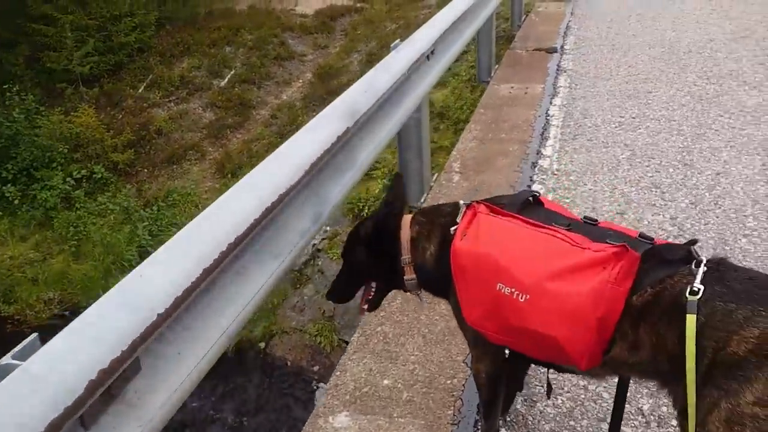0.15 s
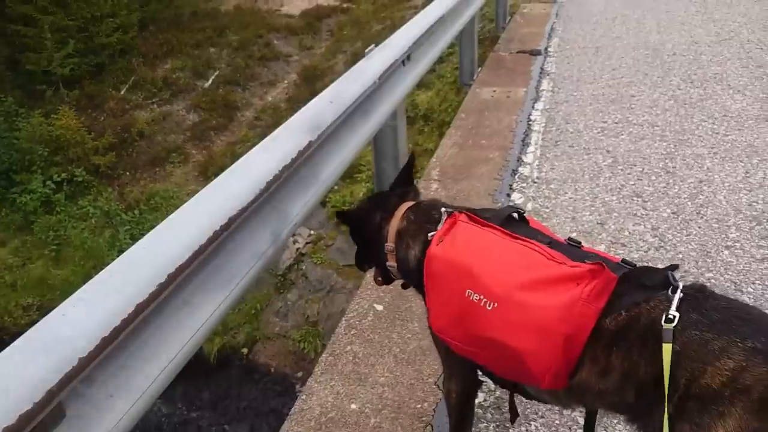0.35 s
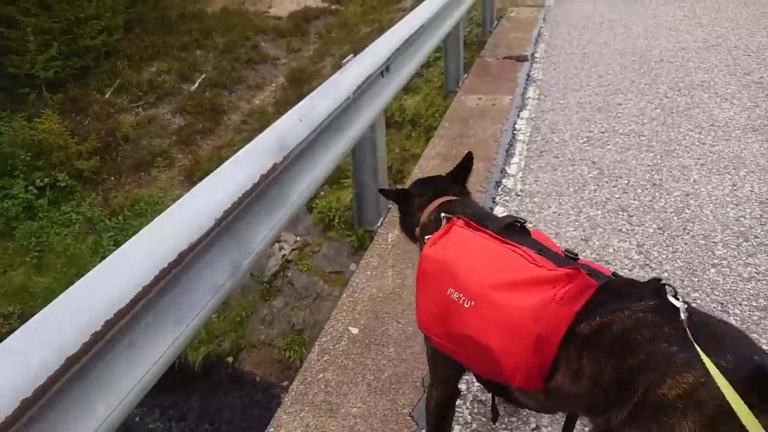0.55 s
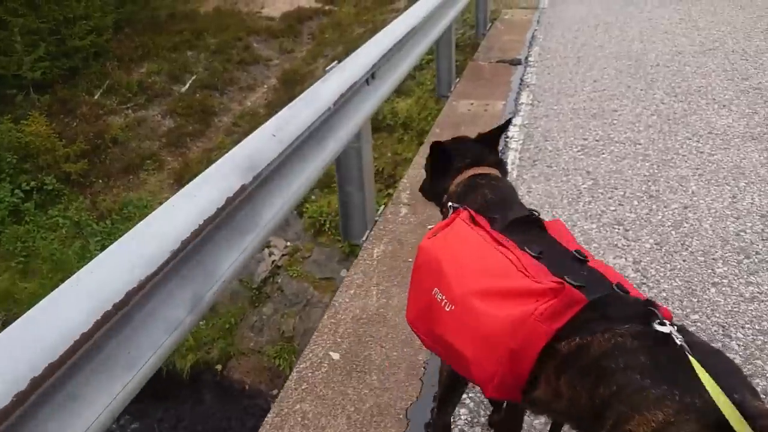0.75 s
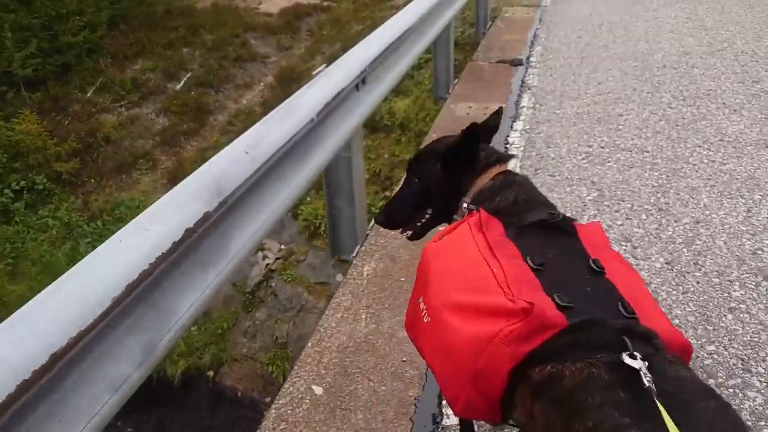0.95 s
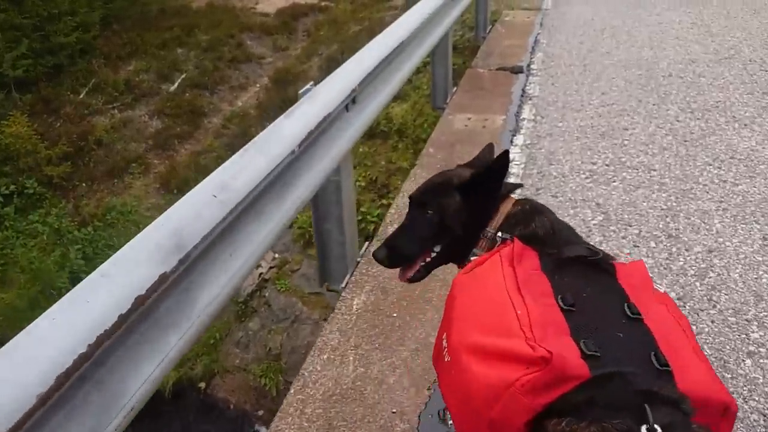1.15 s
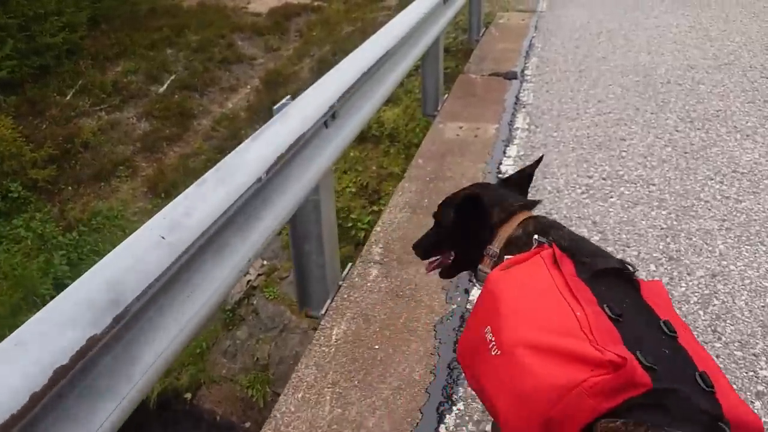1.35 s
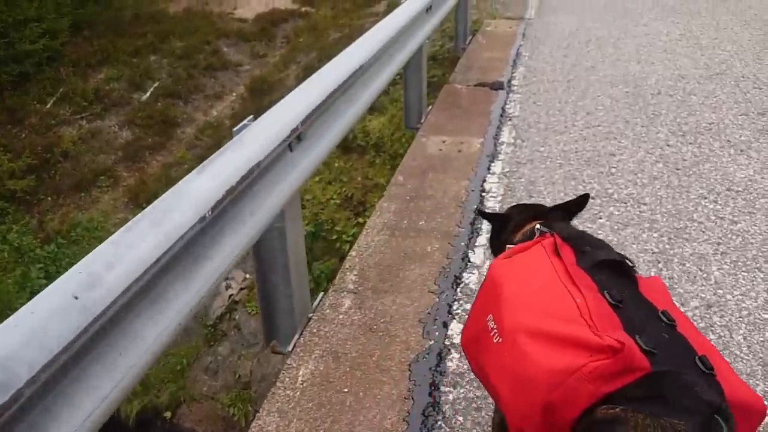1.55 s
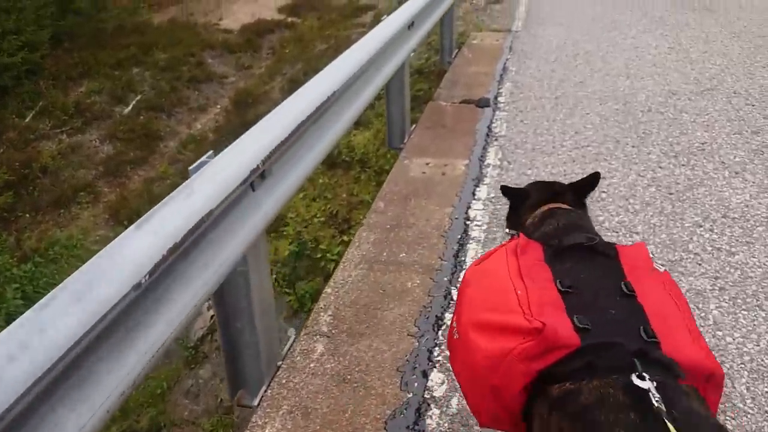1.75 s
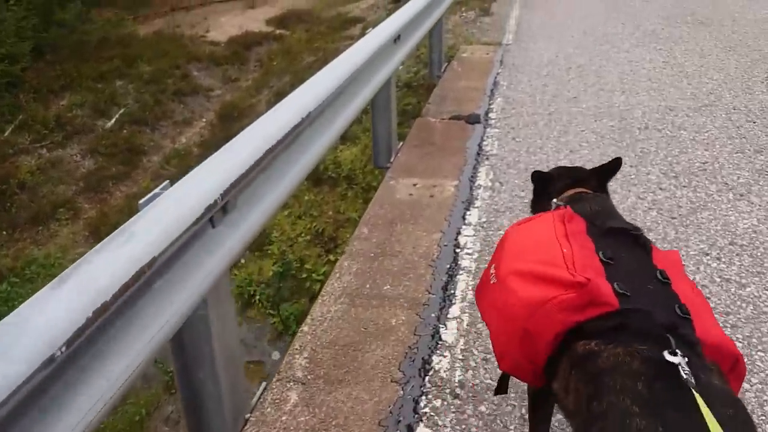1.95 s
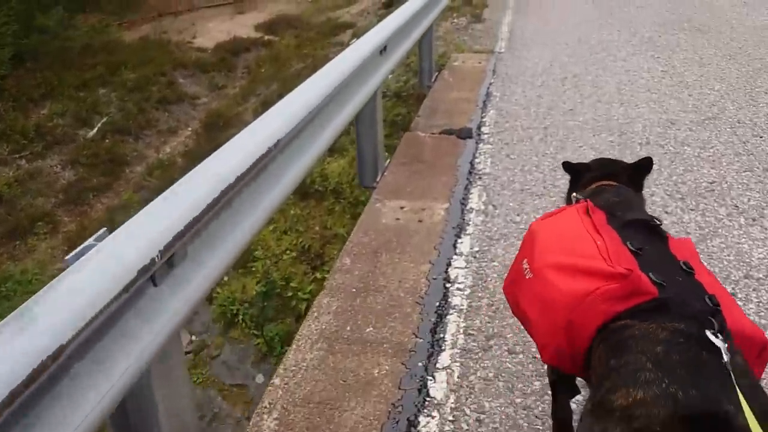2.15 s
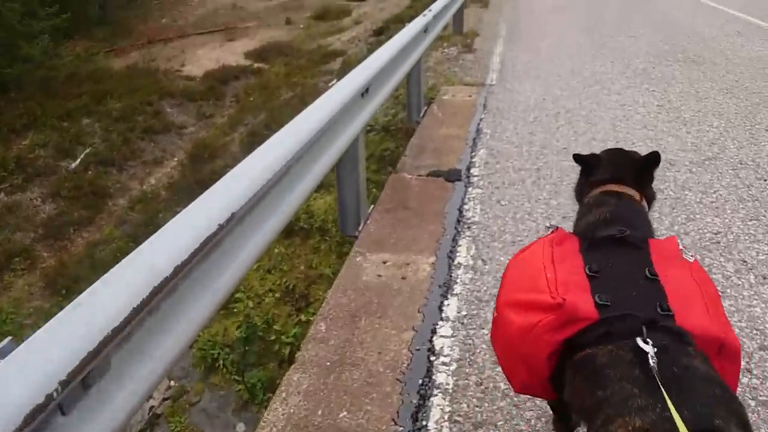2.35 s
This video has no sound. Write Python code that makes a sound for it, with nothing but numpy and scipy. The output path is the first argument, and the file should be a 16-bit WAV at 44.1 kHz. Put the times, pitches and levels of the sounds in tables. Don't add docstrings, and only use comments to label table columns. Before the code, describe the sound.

A small stream rushes steadily over stones below left. Close on the right, a retractable dog lead ratchets in two rapid bursts, then its brake snaps once; soft paw steps, outdoors, hand-held stereo microphone.

```python
import sys
import numpy as np
from scipy import signal
from scipy.fft import rfft, irfft
from scipy.io import wavfile
from scipy.ndimage import uniform_filter1d

SR = 44100
rng = np.random.default_rng(int(sys.argv[2]) if len(sys.argv) > 2 else 0)


def gain_from_db(level_db):
    decades = np.asarray(level_db, float) / 20
    return 10 ** decades


def master(y):
    cut = np.clip(np.atleast_2d(y).T, -1, 1)
    pcm = np.round(cut * 32767)
    wavfile.write(sys.argv[1], SR, pcm.astype(np.int16))


N = 105840

# time in seconds, level in dB.
FLOW = [(0, -52.5), (.3, -49), (.55, -50), (.65, -51), (.75, -51), (.85, -51.5), (1.3, -51), (1.45, -49.5),
        (1.62, -50.5), (1.74, -47.5), (1.88, -51), (2.05, -49.5), (2.4, -51.5)]
# frequency in Hz, density in dB per Hz.
WATER_TONE = [(30, -3), (70, -2), (185, -9.5), (310, 4.5), (700, -0.5), (1500, -4.5), (3500, -11.5),
              (8000, -21.5)]
# frequency in Hz, likeness from 0 to 1.
WATER_LIKENESS = [(100, 0), (250, 1), (500, 0.6), (900, 0.72), (1700, 0.38), (4000, 0.34), (6000, 0.016),
                  (9000, 0)]
# time in seconds, level in dB.
SPLASH = [(0, 4.5), (.5, -4), (.8, -3), (1.1, -1), (1.4, 0), (1.6, 1), (1.9, 0.5), (2.4, 1.5)]
# start in seconds, level in dB, pitch in Hz.
GLUGS = [(0.556, -34, 536), (0.718, -33.5, 369), (.74, -33.5, 600), (.86, -37.5, 307), (1.11, -36, 322),
         (1.184, -38, 247), (1.222, -34.5, 318), (1.627, -37, 243), (1.73, -33.5, 347), (1.995, -38, 398),
         (2.016, -39, 277), (2.067, -43, 260), (2.099, -43.5, 225), (2.179, -40, 378), (2.21, -41.5, 272),
         (1.44, -41.5, 348), (1.483, -44, 375), (.641, -41, 405), (.686, -47, 372), (0.051, -46.5, 224),
         (1.76, -44, 443)]
# start in seconds, level in dB, pitch in Hz, left-right balance in dB.
PAWS = [
    (0.173, -32, 132, -3),
    (0.236, -37.5, 137, -11),
    (0.46, -45, 97, -17),
    (1.037, -43, 153, -11),
    (1.442, -51, 147, -20),
    (1.507, -41, 136, -10),
    (2.042, -31, 171, -3),
    (2.056, -39.5, 114, -8),
    (2.105, -52, 70, -17),
    (2.252, -43, 50.7, -26),
]
# start in seconds, pawl snap in dB, casing in dB, spring ping in dB.
TEETH = [(0.1794, -25, -35.5, -50), (0.208, -21.5, -27, -44), (0.2187, -26, -35, -48),
         (0.235, -23.5, -26, -36), (0.2426, -21.5, -39, -44), (0.2549, -17.5, -24.5, -34.5),
         (0.2627, -26, -32.5, -45), (0.2732, -18.5, -23.5, -37), (0.2807, -22, -30, -37),
         (0.2897, -19, -28, -31), (0.3035, -20, -23.5, -31), (0.3163, -18, -24, -32),
         (0.3218, -24, -39, -42), (0.329, -24, -28, -41), (0.3324, -24.5, -30.5, -41),
         (0.3413, -27, -30, -48), (0.3513, -19.5, -27, -36), (0.361, -22.5, -24.5, -28.5),
         (0.3694, -13.5, -27.5, -25), (0.3785, -15, -26, -25.5), (0.387, -15.5, -24.5, -25.5),
         (0.396, -23.5, -27, -29.5), (0.4046, -21, -24.5, -36), (0.428, -33, -28.5, -47),
         (0.4341, -19.5, -30, -32), (0.4423, -19.5, -26, -25), (0.4493, -18.5, -28, -29),
         (0.4565, -26, -23.5, -38), (0.4654, -25.5, -40, -29.5), (0.4692, -28, -54, -36),
         (0.4718, -45, -28, -49), (0.4806, -49, -45, -60), (0.486, -51, -43, -57),
         (0.5055, -38.5, -44, -64)]
# frequency in Hz, level in dB, width in Hz.
CASING_MODES = [(406, -6, 50), (474, 3, 50), (786, -8.5, 85), (1004, 2.5, 70), (1250, 4.5, 58),
                (1387, 11.5, 91), (1510, 5, 104), (1640, -8.5, 150)]
# frequency in Hz, level in dB, width in Hz.
PAWL_MODES = [(2545, -9, 52), (2840, -8.5, 70), (3490, 2, 390), (4600, 5.5, 860), (5510, 5, 550),
              (6630, 1.5, 330), (7660, 0.5, 490)]
# frequency in Hz, level in dB, width in Hz.
SPRING_MODES = [(8600, 6.5, 1140), (10600, -7, 720), (11730, 2, 500), (13000, 6, 740), (14440, 12, 570)]
# frequency in Hz, gain in dB.
FAR_SHADE = [(200, -1), (700, -13), (1350, 2.5), (2200, -3.5), (3500, -4), (6000, -13.5), (9000, -16.5),
             (15000, -13)]
# frequency in Hz, likeness from 0 to 1.
LEAD_LIKENESS = [(400, .9), (1700, .96), (2500, .6), (8000, .45)]
# start in seconds, level in dB, pitch in Hz, width in Hz.
CLASP_TICKS = [
    (0.65, -48, 7000, 1500),
    (0.731, -47, 10170, 300),
    (0.848, -36, 12600, 5000),
    (0.871, -45, 12500, 2000),
    (0.933, -38, 14500, 3000),
    (1.097, -47, 11500, 4000),
    (2.009, -44.5, 5000, 4000),
    (2.217, -44, 4130, 500),
]
# start in seconds, level in dB.
BRAKE_HITS = [
    (1.1665, -3),
    (1.1707, -14),
    (1.1729, -18),
    (1.178, -28),
]
# frequency in Hz, level in dB, width in Hz.
BRAKE_MODES = [(1070, -3, 218), (1900, -10, 400), (2175, -0.5, 450), (3500, -5, 500), (3870, -12.5, 150),
               (4780, -5, 260), (6250, -6, 710), (6900, -5.5, 560), (9100, -11, 660), (10700, -6, 1100),
               (13500, -4, 740), (14700, -3, 930)]
# frequency in Hz, density in dB per Hz.
HISS_TONE = [(2000, -72), (6000, -10), (9000, 0), (16000, 9)]
# frequency in Hz, gain in dB.
LEFT_PORT = [(150, -13), (350, -12), (800, -4), (2000, -6), (3000, -10), (5500, -2), (12000, -7),
             (16000, -12)]
# frequency in Hz, gain in dB.
RIGHT_PORT = [(60, -16.5), (1000, -3.5), (7000, -0.5), (7500, -2), (8100, -12.5), (9000, -6.5), (12000, -9),
              (16000, -17)]

WASH_DB, FIZZ_DB, BUBBLES_DB = 10.5, -5, 1
PATCH_DB, FLICKER_DB = 2, 0.95
SPLASH_HZ, SPLASH_OCTAVES = 1700, 0.2
BROOK_LAG_S, LEAD_LAG_S = 0.00045, 0.00031
SLIP_S, CASING_SLIP_S, RATTLE_S, MODE_SPREAD_DB = 0.00045, 0.0008, 0.005, 2
RATTLE_DB, FAR_RATTLE_DB = -9, 5
REBOUND_S, REBOUND_DB = 0.0028, -7
LEAD_CUT_HZ, BRAKE_CUT_HZ = 263, 830
STRIKE_T = np.arange(1200) / SR
HISS_EDGE_HZ, EDGE_HZ = 15770, 16250


def evened(x):
    return x / np.sqrt(np.mean(x ** 2) + 1e-20)


def read(points, hz):
    f, value = np.transpose(points)
    return np.interp(np.log(hz + 1), np.log(f + 1), value)


def add(mix, s, sound):
    part = mix[:, round(s * SR):][:, :sound.shape[1]]
    part += sound[:, :part.shape[1]]


def colour(x, db_of):
    hz = np.abs(np.fft.fftfreq(2048, 1 / SR))
    log_gain = np.log(gain_from_db(np.maximum(db_of(hz), -60)))
    taps = np.fft.ifft(np.exp(np.conj(signal.hilbert(log_gain)))).real[:1024]
    return signal.oaconvolve(x, taps)[:len(x)]


def spread(paths, likeness, lag_s):
    hz = np.fft.rfftfreq(N, 1 / SR)
    shared = np.clip(read(likeness, hz), 0, 1)
    first, own = rfft(paths, axis=1)
    later = shared * first + np.sqrt(1 - shared ** 2) * own
    return paths[0], irfft(later * np.exp(-2j * np.pi * hz * lag_s), N)


def wash():
    frames, hz = N // 128 + 5, np.fft.rfftfreq(512, 1 / SR)
    a, b, c, d, patches = rng.standard_normal((frames, 257, 5)).T
    patches = evened(uniform_filter1d(uniform_filter1d(patches, 5, 0), 18, 1))
    flicker = rng.standard_normal((frames, 257)).T
    flicker = evened(uniform_filter1d(uniform_filter1d(flicker, 80, 0), 3, 1))
    band = np.exp(-(np.log2((hz + 1) / SPLASH_HZ) / SPLASH_OCTAVES) ** 2)
    splash_db = np.outer(band, np.interp(np.arange(frames) * 128 / SR, *np.transpose(SPLASH)))
    level_db = PATCH_DB * patches + FLICKER_DB * flicker + splash_db
    spectra = np.array([a + 1j * b, c + 1j * d]) * gain_from_db(level_db)
    noise = signal.istft(spectra, nperseg=512, noverlap=384)[1][:, :N]

    def tone(f):
        return read(WATER_TONE, f) - 50 * np.clip(f / 8000 - 1, 0, 1)
    return evened(np.array([colour(x, tone) for x in noise]))


def chirp(hz, cycles, rise):
    u = np.arange(0, 1.5 * cycles, hz / SR)
    swell = (u / cycles) * np.exp(1 - 4 * u / cycles) * 4
    return np.sin(2 * np.pi * u * (1 + rise * u / cycles / 2)) * swell


def grains(lo_hz, hi_hz, cycles, rise, per_s, spread_db, count):
    out = np.zeros(N)
    for hz in np.geomspace(lo_hz, hi_hz, count):
        bursts = rng.random(N) < per_s / count / SR
        size = gain_from_db(spread_db * np.minimum(rng.exponential(1, N), 5))
        bubble = chirp(hz, cycles, rise) * gain_from_db(read(WATER_TONE, hz))
        out += signal.oaconvolve(size * bursts, bubble)[:N]
    return evened(out)


def brook():
    fizz = np.array([grains(900, 7500, 7, 0.15, per_s=900, spread_db=4, count=16) for _ in "ab"])
    low = np.array([grains(257, 883, 5.3, 0.22, per_s=200, spread_db=3.5, count=12) for _ in "ab"])
    flow = gain_from_db(np.interp(np.arange(N) / SR, *np.transpose(FLOW)))
    mix = flow * (gain_from_db(WASH_DB) * wash() + gain_from_db(FIZZ_DB) * fizz + gain_from_db(BUBBLES_DB) * low)
    for s, db, hz in GLUGS:
        add(mix, s, gain_from_db(db) * chirp(hz, cycles=9.2, rise=0.18) * np.ones((2, 1)))
    return np.array(spread(mix, WATER_LIKENESS, BROOK_LAG_S))


def paws():
    mix = np.zeros((2, N))
    cycles, tail_s, tail_db = 2.2, 0.022, -6.5
    for s, db, hz, pan_db in PAWS:
        a, b = rng.random(2)
        side = gain_from_db([[db + pan_db / 2], [db - pan_db / 2]])
        add(mix, s, chirp(hz, cycles, 0.0083) * side)
        settling = chirp(hz * (0.81 + 1.24 * b), cycles, -0.054)
        add(mix, s + tail_s * (0.5 + a), settling * side * gain_from_db(tail_db))
    return mix


def low_cut(x, hz):
    return signal.sosfilt(signal.butter(5, hz, "high", fs=SR, output="sos"), x)


def ring(modes, spread_db, detune=0.025):
    hz, db, width = np.transpose(modes)[:, :, None]
    a, b = rng.standard_normal((2, len(modes), 1))
    decay = gain_from_db(db + spread_db * a) * np.exp(-np.pi * width * STRIKE_T)
    return (decay * np.sin(2 * np.pi * hz * (1 + detune * b) * STRIKE_T)).sum(0)


def push(u):
    u = np.maximum(u, 0)
    return (u / 2) ** 2 * np.exp(2 - u)


def strike(modes, db, slip_s, rattle_db):
    t = STRIKE_T[:700]
    grit, u = rng.standard_normal((2, 700)), t / slip_s
    a, b = rng.random(2)
    rebound = gain_from_db(REBOUND_DB - 10 * b) * push(u - REBOUND_S * (1 + a) / slip_s)
    rattle_level = gain_from_db(rattle_db + np.array([[0], [FAR_RATTLE_DB]]))
    rattle = rattle_level * np.minimum(u / 2, 1) * np.exp(-t / RATTLE_S)
    drive = grit * np.sqrt(abs(grit)) * (push(u) + rebound + rattle)
    out = signal.fftconvolve(drive, ring(modes, MODE_SPREAD_DB)[None], axes=1)
    return gain_from_db(db) * out / np.sqrt((out[:, :260] ** 2).mean(1, keepdims=True))


def ratchet(mix):
    for s, snap_db, casing_db, ping_db in TEETH:
        add(mix, s, strike(PAWL_MODES, snap_db - 4, SLIP_S, RATTLE_DB))
        add(mix, s, strike(CASING_MODES, casing_db + 6, CASING_SLIP_S, RATTLE_DB - 5))
        add(mix, s, strike(SPRING_MODES, ping_db + 12, SLIP_S, RATTLE_DB - 7))


def clasp(mix):
    for s, db, hz, width in CLASP_TICKS:
        modes = [(hz, 0, width), (1.15 * hz, -3, width)]
        add(mix, s, strike(modes, db, 0.001, -12) * gain_from_db([[0], [6]]))


def brake(mix):
    onset = np.tanh(STRIKE_T / 0.00025)
    for s, db in BRAKE_HITS:
        near, far = ring(BRAKE_MODES, 0.34, detune=0.005), ring(BRAKE_MODES, 2.7, detune=0.014)
        add(mix, s, gain_from_db(db) * low_cut(onset * np.array([near, far]), BRAKE_CUT_HZ))
    rattle = strike(BRAKE_MODES, -29, SLIP_S, -1)
    add(mix, BRAKE_HITS[0][0], low_cut(rattle, BRAKE_CUT_HZ))


def dog_lead():
    mix = np.zeros((2, N))
    ratchet(mix)
    clasp(mix)
    brake(mix)
    near, far = spread(low_cut(mix, LEAD_CUT_HZ), LEAD_LIKENESS, LEAD_LAG_S)
    return np.array([colour(far, lambda f: read(FAR_SHADE, f)), near])


def scene():
    return brook() + paws() + dog_lead()


def port_hiss():
    def tone(f):
        return read(HISS_TONE, f) - 60 * (f > HISS_EDGE_HZ)
    hiss = np.array([evened(colour(x, tone)) for x in rng.standard_normal((2, N))])
    flicker = evened(uniform_filter1d(rng.standard_normal((2, N)), 200))
    return gain_from_db(-49.5) * hiss * gain_from_db(2.5 * flicker)


def band_edge(f):
    return -10 * np.log10(1 + (f / EDGE_HZ) ** 200)


def left_response(f):
    notch = -21 * np.exp(-((f - 6850) / 540) ** 4)
    skirt = -9 * np.exp(-((f - 1.04 * 6850) / 1200) ** 2)
    return read(LEFT_PORT, f) + notch + skirt - 30 * (f > HISS_EDGE_HZ) + band_edge(f)


def right_response(f):
    return read(RIGHT_PORT, f) + band_edge(f)


def band_limit(x):
    return signal.sosfilt(signal.butter(12, 16640, fs=SR, output="sos"), x)


def record(dry):
    left, right = dry + port_hiss()
    return band_limit(np.array([colour(left, left_response), colour(right, right_response)]))


dry = scene()
out = record(dry)
master(out)
```